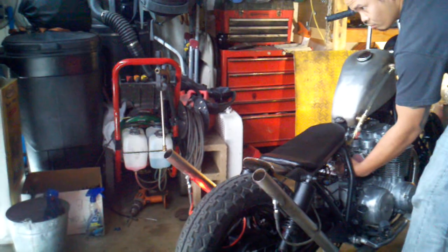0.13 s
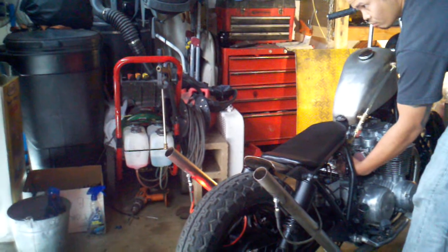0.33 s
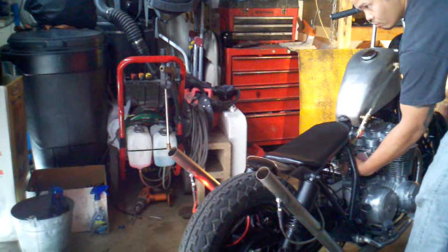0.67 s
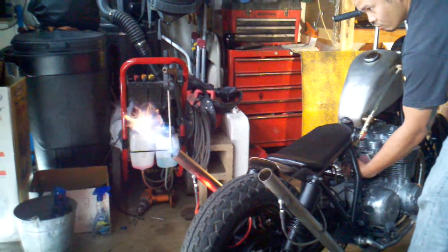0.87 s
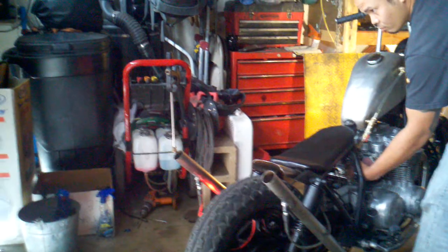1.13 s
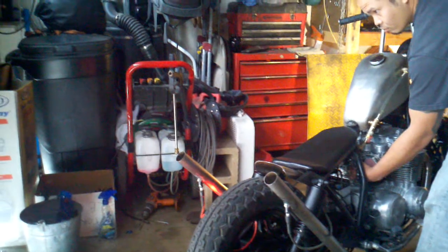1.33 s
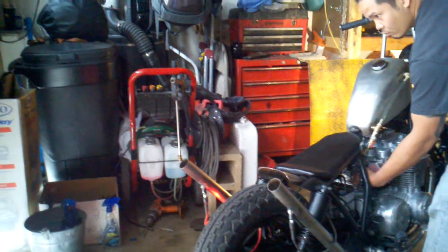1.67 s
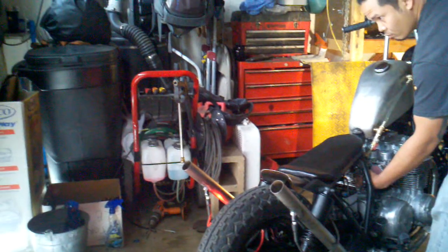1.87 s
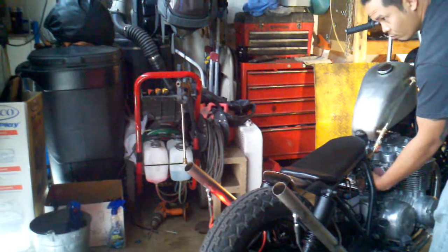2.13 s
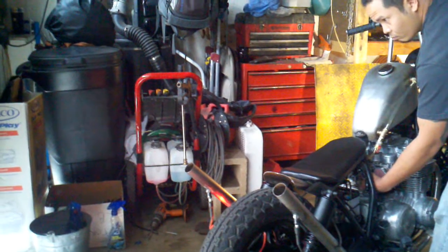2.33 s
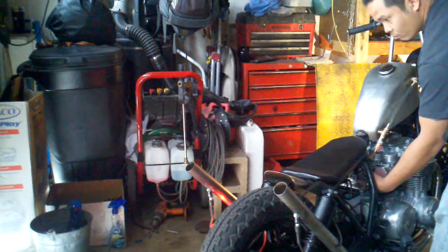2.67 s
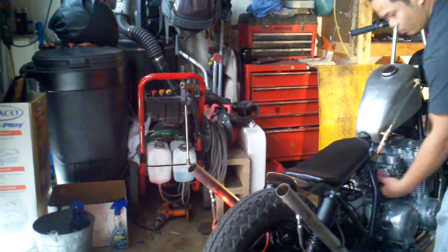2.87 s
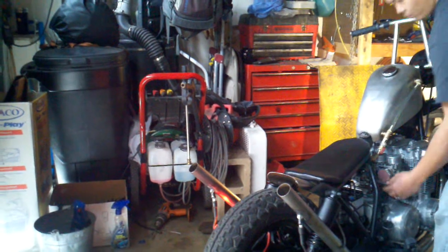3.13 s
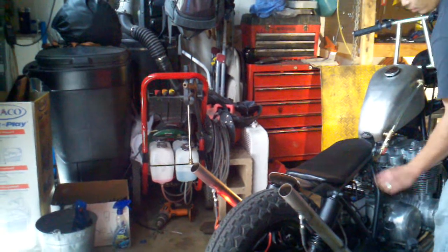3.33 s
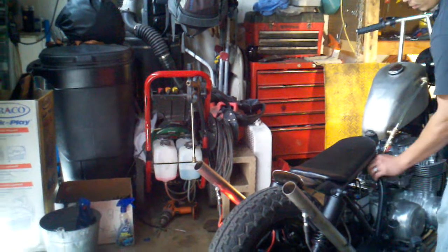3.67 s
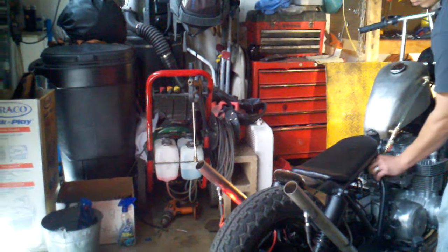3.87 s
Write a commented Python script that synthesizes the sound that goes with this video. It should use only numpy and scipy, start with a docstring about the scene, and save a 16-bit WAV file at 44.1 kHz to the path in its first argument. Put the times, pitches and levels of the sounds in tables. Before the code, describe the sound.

A motorcycle engine with open pipes crackles as it climbs, revs twice with a throaty rasp, pops as the second rev falls, then sinks to a quieter idle. The microphone is close by in a small garage.

```python
"""A four-cylinder motorcycle with open pipes, revved twice and left to sink to idle in a cluttered garage.
Each firing thumps into the pipes and throws a rasp and a hiss; two cylinders pull harder than the rest.
The pipes crack and bark on the way up, and unburnt fuel pops in them as the second rev falls away.
Valve gear ticks and the chain whirrs underneath. The microphone is a small camera near the bike:
two closely spaced capsules feeding a stereo widener."""
import sys
import numpy as np
from scipy import signal
from scipy.fft import rfft, irfft, next_fast_len
from scipy.io import wavfile
from scipy.ndimage import uniform_filter1d

SR = 44100
rng = np.random.default_rng(int(sys.argv[2]) if len(sys.argv) > 2 else 0)


def master_out(mix):
    """Clip the mix to full scale and print it as 16-bit PCM to the path in sys.argv[1]."""
    frames = np.transpose(np.atleast_2d(mix))
    ceiling = np.clip(frames, -1, 1)
    pcm = np.round(ceiling * 32767).astype(np.int16)
    wavfile.write(sys.argv[1], SR, pcm)


N = 176400

# Engine speed through the two revs: time_s, firing_rate_hz
FIRING_RATE = [(0.0, 53.82), (0.1, 56.3), (0.22, 64.6), (0.36, 76.45), (0.55, 81.13), (0.72, 87.62),
               (0.88, 98.77), (1.05, 117.5), (1.17, 125.1), (1.3, 115), (1.55, 91.5), (1.75, 87.65),
               (1.92, 95.83), (2.1, 118.5), (2.24, 142.3), (2.36, 127.1), (2.55, 99.53), (2.8, 82.4),
               (3.05, 69.23), (3.3, 60.7), (3.6, 55.55), (4.0, 55.43)]
def crank():
    """Engine cycles turned so far, at four firings a cycle."""
    rate_hz, = in_time(FIRING_RATE)
    return np.cumsum(rate_hz) / SR / 4


# Strength of each cylinder at full unevenness: thump_db, rasp_db, hiss_db
CYLINDER_BALANCE = [(0, -2, -3), (-1, 0, 0), (-7, -8, -12), (-15, -14, -18)]
def firings(unevenness, scatter_db):
    """The cylinders fire in turn, each a little off in time and size: thump, rasp and hiss pulses."""
    first_firing_cycles, jitter_s_per_db = .82, .00007
    cycles = crank()
    number = np.arange(-3, 4 * cycles[-1] - 4).astype(int)
    chance = rng.standard_normal((len(number), 3))
    at = np.interp(first_firing_cycles + number / 4, cycles, np.arange(N)).astype(int)
    jitter_s = chance[:, 0] * scatter_db[at] * jitter_s_per_db
    at = (at + jitter_s * SR).clip(0, N - 1).astype(int)
    cylinder_db = np.array(CYLINDER_BALANCE)[number % 4] * unevenness[at, None]
    pulse_db = cylinder_db + scatter_db[at, None] * chance[:, [1, 2, 2]]
    return [clicks(at, amp(db)) for db in pulse_db.T]


# Resonances of the air in the pipes: pitch_hz, width_hz, pulse_gain_db, flow_gain_db
PIPE_MODES = [(138.8, 32.4, -10, -9.5), (199, 17.2, -2, 3.5), (272.8, 13.8, 2.5, -0.5),
              (313.3, 33.5, 0.5, -9.5), (403.3, 41.3, -5.5, 1.5), (429.2, 32.3, -1, 0), (468, 55, -6, -9.5),
              (578, 58, -20, -2.5), (703, 53, -9.5, -4), (380, 73, -21, -26)]
# Tone of the thump at the microphone: frequency_hz, gain_db
THUMP_TONE = [(30, -34), (70, -9), (130, -3.5), (235, -5), (290, 0.5), (360, -3.5), (450, -7),
              (1000, -33.5), (2000, -22.5), (4000, -62.5)]
def pipes(pulses, flow, boom=1):
    """Pulses and turbulent flow ring the pipes; boom scales the three resonances under 300 Hz."""
    ring = 0
    for k, (hz, width_hz, pulse_db, flow_db) in enumerate(PIPE_MODES):
        drive = amp(pulse_db) * pulses + amp(flow_db) * flow
        ring = ring + resonance(drive * (boom if k < 3 else 1), hz, width_hz)
    direct = amp(-29.5) * (pulses + flow)
    return colour(ring + direct, THUMP_TONE)


# Drive to the low pipe resonances: time_s, gain_db
LOW_MODE_DRIVE = [(0, 3), (.5, 2), (.85, -2), (1.1, -10), (1.3, 0), (1.5, -5), (1.65, 0), (1.9, 1),
                  (2.1, -24), (2.2, -11), (2.4, -1), (2.6, -0.5), (3.2, 1), (4, 4)]
def boom_gain():
    """The boom of the pipes thins near the top of each rev."""
    return amp(in_time(LOW_MODE_DRIVE)[0])


# Exhaust levels as the throttle opens and shuts: time_s, thump_db, rasp_db, hiss_db, drone_db
EXHAUST_LEVELS = [(0, -24, -31, -35, -35), (.2, -18, -35.5, -41, -39.5), (.45, -17, -34.5, -43, -56),
                  (.6, -17, -31.5, -41.5, -46), (.85, -15.5, -31.5, -46, -57), (.97, -13, -29.5, -46, -66),
                  (1.045, -11.5, -28, -47, -57), (1.075, -14, -36, -48.5, -70),
                  (1.25, -17.5, -34, -47.5, -50), (1.53, -21, -38, -51, -45.5),
                  (1.7, -21.5, -41.5, -51, -60), (1.92, -18, -36, -46.5, -43.5),
                  (2.03, -9.5, -29, -47, -47), (2.13, -12.5, -31.5, -44.5, -58),
                  (2.2, -15.5, -29.5, -46.5, -62), (2.33, -15.5, -26, -46, -51),
                  (2.38, -23.5, -32.5, -49.5, -45), (2.46, -25, -36.5, -52, -47.5),
                  (2.8, -27, -47, -56, -62), (3.1, -29.5, -51, -56.5, -56.5), (3.6, -31, -52, -56, -51.5),
                  (4, -31.5, -49.5, -54.5, -51)]
# How roughly the engine runs: time_s, unevenness_share, scatter_db, turbulent_share
ROUGHNESS = [(0, 1.0, 2.0, .08), (.5, 1.0, 2.0, .12), (.65, .7, 2.5, .22), (1.0, .65, 2.2, .22),
             (1.1, .8, 1.0, .2), (1.25, .8, 1.2, .25), (1.35, .75, 3.0, .55), (1.52, .6, 3.0, .5),
             (1.65, .35, 2.5, .38), (1.9, .4, 2.5, .35), (2.05, .75, 2.0, .25), (2.2, .9, 2.0, .4),
             (2.35, .6, 3.0, .6), (2.6, .6, 3.0, .6), (4, .6, 3.0, .6)]
# Tone of the rasp at the microphone: frequency_hz, gain_db
RASP_TONE = [(300, -19.5), (600, 11), (1000, 2.5), (1500, -6), (2100, -3), (2800, -9), (4000, -37.5),
             (8000, -30.5)]
# Tone of the hiss at the microphone: frequency_hz, gain_db
HISS_TONE = [(1500, -3), (2800, -0.5), (4000, 0), (5500, -1.5), (7000, -0.5), (8500, 0), (11000, -3),
             (14000, -8.5)]
def exhaust():
    """Thump, drone, rasp and hiss of the near pipe; row two is the rasp and hiss of the other pipe."""
    thump_db, rasp_db, hiss_db, drone_db = in_time(EXHAUST_LEVELS)
    unevenness, scatter_db, turbulent_share = in_time(ROUGHNESS)
    thump_pulses, rasp_pulses, hiss_pulses = firings(unevenness, scatter_db)
    pulses = np.sqrt(1 - turbulent_share) * even_level(thump_pulses, SR // 6)
    lumps = rms_one(amp(3.0 * drift(hz=10)))
    flow = np.sqrt(turbulent_share) * lumps * rng.standard_normal(N)
    thump = pipes(pulses * amp(thump_db), flow * amp(thump_db), boom_gain())
    thump /= np.std(pipes(pulses, flow))
    low_end = thump + drone(drone_db)
    rasp = pipe_walls(colour(puffs(rasp_pulses, decay_s=.0047, steady_share=.9), RASP_TONE))
    hiss = colour(puffs(hiss_pulses, decay_s=.012, steady_share=.57), HISS_TONE)
    both_pipes = amp(rasp_db) * rms_one(rasp) + amp(hiss_db) * rms_one(hiss)
    both_pipes[0] += low_end
    return both_pipes


def puffs(pulses, decay_s, steady_share):
    """Gas leaves both pipes in dying puffs over a steady rush, each pipe with its own noise."""
    gate = even_level(decay(pulses, decay_s), SR // 8)
    return (steady_share + (1 - steady_share) * gate) * rng.standard_normal((2, N))


# Low engine orders: firing_rate_multiple, level_db
DRONE_ORDERS = [(1, 9.5), (1.5, -8.5), (2, 1), (2.5, -0.5), (3, -19)]
# Tone of the drone at the microphone: frequency_hz, gain_db
DRONE_TONE = [(40, -3), (55, -5.5), (80, 11), (120, 2), (200, 18.5), (300, -2.5), (420, -31.5)]
def drone(level_db):
    """Clean low tones follow the firing rate and waver in level."""
    firing_phase = 2 * np.pi * 4 * crank()
    tones = sum(amp(db) * np.sin(multiple * firing_phase) for multiple, db in DRONE_ORDERS)
    return colour(amp(level_db + 2.5 * drift(hz=9)) * tones, DRONE_TONE)


# Narrow rings of the thin pipe walls: pitch_hz, width_hz, gain_db
WALL_MODES = [(540, 20, 8), (748, 32, -2.5), (1010.8, 9.9, 8), (1096, 23, 0.5), (1181, 65, -5),
              (1296, 20, 1.5), (1337, 30, 1.5), (1464, 9.7, 10.5), (1757, 6.8, 5)]
def pipe_walls(rasp):
    """The rasp sets the pipe walls ringing."""
    return rasp + sum(amp(db) * resonance(rasp, hz, width_hz) for hz, width_hz, db in WALL_MODES)


# Firings much harder than their neighbours: start_s, level_db
HARD_FIRINGS = [(0.663, -1), (0.707, -1), (0.795, 1), (0.878, 1), (0.918, -2.5), (0.958, -17), (1.045, -5),
                (1.351, -15), (2.001, -6.5), (2.047, -9), (2.084, -5), (2.114, -11.5), (2.136, 2.5),
                (2.166, 1)]
def barks():
    """Each bark is one clean pressure pulse into the pipes."""
    unit_peak = np.abs(pipes(clicks([0], [1]), 0)).max()
    return amp(-3.5) * pipes(strikes(HARD_FIRINGS), 0, boom_gain()) / unit_peak


# Pops as the second rev falls away: start_s, level_db
FUEL_POPS = [(2.262, -4.5), (2.29, -4), (2.318, -4)]
def pops():
    """Unburnt fuel goes off: a noisy blast through the pipes with a low boom."""
    boom_hz = 153.2
    noise = rng.standard_normal(N)
    bursts = decay(strikes(FUEL_POPS), decay_s=.018) * noise
    blast = pipes(bursts, 0, boom_gain()) / np.std(pipes(noise, 0))
    boom = resonance(bursts, boom_hz, width_hz=33) / np.std(resonance(noise, boom_hz, width_hz=81))
    return amp(-10) * (blast + amp(-3) * boom)


# Cracks while the revs are still low: start_s, level_db
MOUTH_CRACKS = [(0.0598, -15.5), (0.0784, -17.5), (0.132, -23), (0.1487, -17), (0.196, -21), (0.214, -20),
                (0.257, -20.5), (0.314, -20.5), (0.3652, -20.5), (0.383, -24), (0.417, -30), (0.545, -27)]
# Tone of a crack at the microphone: frequency_hz, gain_db
CRACK_TONE = [(500, -24), (900, 1), (1400, 12.5), (2200, 11), (3500, 2), (5500, -3), (8500, 4), (11000, 2),
              (14000, 1.5)]
def cracks():
    """Short bright bursts of noise at the two pipe mouths."""
    rise_s = .0008
    gate = decay(strikes(MOUTH_CRACKS), decay_s=.009)
    gate = uniform_filter1d(gate, int(rise_s * SR) + 1)
    noise = rng.standard_normal((2, N))
    return amp(-6.5) * colour(gate * noise, CRACK_TONE) / np.std(colour(noise, CRACK_TONE))


# Raspy snaps, mostly of single firings, with a late tick among them: start_s, level_db
RASPY_SNAPS = [(0.059, -22), (0.148, -17.5), (0.212, -15), (0.315, -27), (0.367, -25), (0.418, -17.5),
               (0.603, -13), (0.623, -23), (0.745, -22), (0.922, -16.5), (0.966, -15), (0.988, -14.5),
               (1.002, -12.5), (1.039, -18), (1.268, -16), (1.991, -26), (2.002, -17), (2.045, -10),
               (2.189, -12), (2.26, -13.5), (2.289, -9), (2.454, -23.5), (2.687, -30), (2.772, -33),
               (2.844, -30), (3.519, -34), (3.953, -37)]
def snaps():
    """Short bursts of rasp ring the walls of both pipes."""
    gate = decay(strikes(RASPY_SNAPS), decay_s=.0059)
    noise = rng.standard_normal((2, N))
    bursts = pipe_walls(colour(gate * noise, RASP_TONE))
    return amp(-8.5) * bursts / np.std(pipe_walls(colour(noise, RASP_TONE)))


# Two valve ticks each engine cycle: position_cycles, level_db
VALVE_TICKS = [(0.159, -73), (0.677, -59)]
# Rings of the cylinder head: pitch_hz, level_db, t60_s
HEAD_MODES = [(1500, 0, .005), (2200, -2, .004), (3700, -3, .004), (6400, -5, .003), (9000, -6, .003)]
def valve_gear():
    """The valve gear ticks against the metal of the cylinder head, never twice alike."""
    cycles = crank()
    turns = np.arange(int(cycles[-1]))
    at = np.concatenate([np.interp(turns + position, cycles, np.arange(N)) for position, _ in VALVE_TICKS])
    tick_db = np.repeat([db for _, db in VALVE_TICKS], len(turns))
    ring = 0
    for hz, mode_db, t60_s in HEAD_MODES:
        radius, angle = amp(-60 / (t60_s * SR)), 2 * np.pi * hz / SR
        ticks = clicks(at, amp(tick_db + mode_db + 3.0 * rng.standard_normal(len(at))))
        poles = [1, -2 * radius * np.cos(angle), radius ** 2]
        ring = ring + signal.lfilter([0, np.sin(angle)], poles, ticks)
    return ring


def whirr():
    """Chain and gears whirr steadily in the casing."""
    hz, width_hz = 2014, 920
    band = resonance(rng.standard_normal((2, N)), hz, width_hz)
    return amp(-54) * rms_one(resonance(band, hz, width_hz))


def rumble():
    """A faint low background rumble that thins as the firing rate climbs."""
    fade_db_per_hz = .2
    climb_hz = in_time(FIRING_RATE)[0] - FIRING_RATE[0][1]
    low_noise = rms_one(resonance(rng.standard_normal(N), hz=45, width_hz=46))
    return amp(-47 - fade_db_per_hz * climb_hz) * low_noise


# Echo paths between the garage surfaces, a row for mid and a row for side: round_trip_s in each column
ECHO_PATHS = [(.0117, .0153, .0189, .0229, .0271, .0317, .0371, .0433),
              (.0127, .0143, .0199, .0241, .0283, .0331, .0389, .0419)]
# Short decay of the cluttered garage: frequency_hz, t60_s
GARAGE_DECAY = [(60, 0.46), (400, 0.24), (2000, 0.24), (12000, 0.33)]
def garage(sound, row):
    """Sound bounces between the surfaces around the bike, losing some level on every round trip."""
    def response(hz):
        echoes = 0
        for k, trip_s in enumerate(ECHO_PATHS[row]):
            loop = amp(-60 * trip_s / at_hz(GARAGE_DECAY, hz)) * np.exp(-2j * np.pi * hz * trip_s)
            echoes = echoes + (-1) ** k * loop / (1 - loop)
        return echoes / np.sqrt(len(ECHO_PATHS[row]))
    return through(sound, response)


def amp(db):
    """Decibels to gain."""
    return 10 ** (np.asarray(db) / 20)


def rms_one(x):
    """Scale to rms 1."""
    return x / np.sqrt(np.mean(x ** 2) + 1e-20)


def even_level(x, window_samples):
    """Hold the running rms at 1."""
    return x / np.sqrt(uniform_filter1d(x ** 2, window_samples) + 1e-12)


def in_time(rows):
    """The columns after time_s, one value per sample."""
    time_s, *columns = np.transpose(rows)
    return [np.interp(np.arange(N) / SR, time_s, column) for column in columns]


def at_hz(points, hz):
    """Read a spectrum on a log frequency axis."""
    frequencies, values = np.transpose(points)
    return np.interp(np.log(hz + 1), np.log(frequencies), values)


def through(x, response):
    """Filter by a complex response given as a function of Hz."""
    size = next_fast_len(N + SR)
    hz = np.arange(size // 2 + 1) * SR / size
    return irfft(rfft(x, size) * response(hz), size)[..., :N]


def colour(x, tone):
    """Causal (minimum-phase) filter with the gains of a tone table."""
    def response(hz):
        cepstrum = irfft(np.log(amp(at_hz(tone, hz))))
        cepstrum[1:len(cepstrum) // 2] *= 2
        cepstrum[len(cepstrum) // 2 + 1:] = 0
        return np.exp(rfft(cepstrum))
    return through(x, response)


def resonance(x, hz, width_hz):
    """Two-pole peak of gain 1."""
    radius = np.exp(-np.pi * width_hz / SR)
    poles = [1, -2 * radius * np.cos(2 * np.pi * hz / SR), radius ** 2]
    return signal.lfilter(np.array([1, 0, -1]) * (1 - radius ** 2) / 2, poles, x)


def clicks(at, sizes):
    """Impulses at sample positions."""
    return np.bincount(np.clip(at, 0, N - 1).astype(int), sizes, N) + 1e-18


def strikes(events):
    """Impulses from rows of start_s, level_db."""
    start_s, level_db = np.transpose(events)
    return clicks(start_s * SR, amp(level_db))


def decay(pulses, decay_s):
    """Give each impulse an exponential tail."""
    return signal.lfilter([1], [1, -np.exp(-1 / (decay_s * SR))], pulses)


def drift(hz):
    """Slow random wander of rms 1."""
    pole = np.exp(-2 * np.pi * hz / SR)
    return rms_one(signal.lfilter([1], [1, -2 * pole, pole ** 2], rng.standard_normal(N + SR))[SR:])


# Tone of the difference between the capsules: frequency_hz, gain_db
SIDE_TONE = [(50, -11), (120, -24.5), (200, -12), (260, -21), (500, -8.5), (1000, -8.5), (2000, -3),
             (5000, -3.5), (14000, -2.5)]
# Phase lead of the left capsule over the middle: frequency_hz, lead_rad
LEFT_LEAD = [(50, -0.18), (120, 0.0041), (185, -0.13), (260, 0.014), (400, 0.051), (550, 0.22),
             (800, -0.07), (1300, 0.0028)]
def scene():
    """Both capsules face the bike; the other pipe, other echoes and a slight phase lead set them apart."""
    near, other = exhaust() + cracks() + snaps() + whirr()
    bike = near + barks() + rumble() + pops() + valve_gear()
    mid = bike + amp(-8.5) * garage(bike, row=0)
    side = colour(garage(bike, row=1) + amp(2) * other, SIDE_TONE)
    side += through(mid, lambda hz: 1j * at_hz(LEFT_LEAD, hz))
    return np.array([mid + side, mid - side])


def record(dry):
    """The camera's widener subtracts the opposite channel, delayed and dulled; then the top is cut."""
    cross_gain, lag_s, cross_cutoff_hz, cutoff_hz = .985, 17 / SR, 5200, 14050
    def crossfeed(hz):
        return cross_gain * np.exp(-2j * np.pi * hz * lag_s) / np.sqrt(1 + (hz / cross_cutoff_hz) ** 4)
    wide = dry - through(dry[::-1], crossfeed)
    return signal.sosfilt(signal.ellip(10, .3, 60, cutoff_hz, fs=SR, output="sos"), wide)


dry = scene()
out = record(dry)
master_out(out)
```